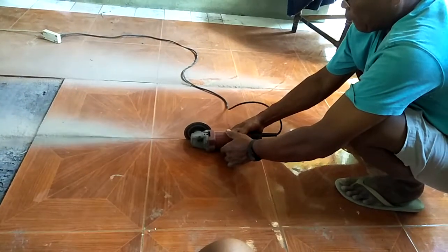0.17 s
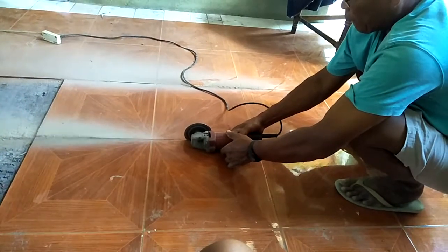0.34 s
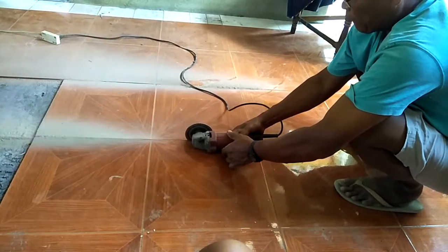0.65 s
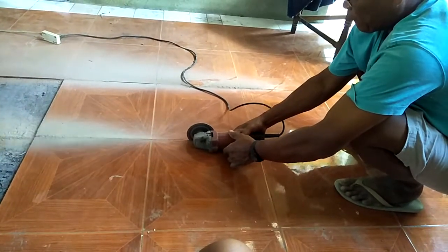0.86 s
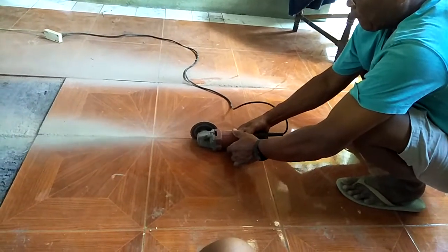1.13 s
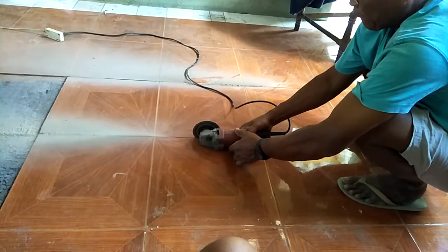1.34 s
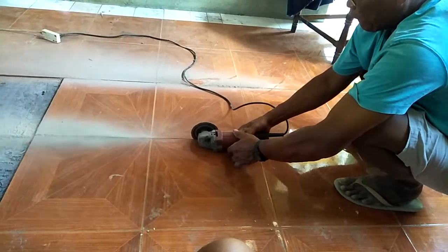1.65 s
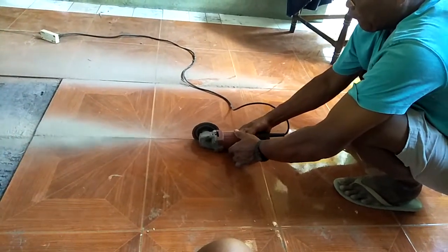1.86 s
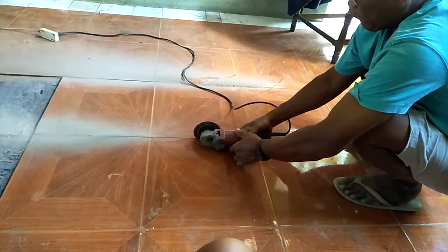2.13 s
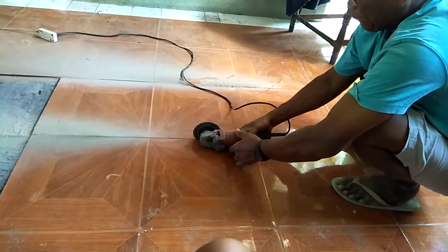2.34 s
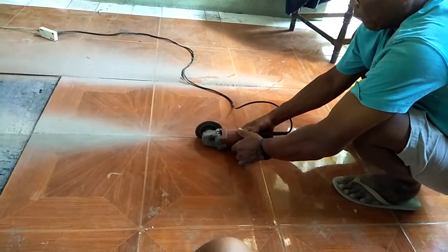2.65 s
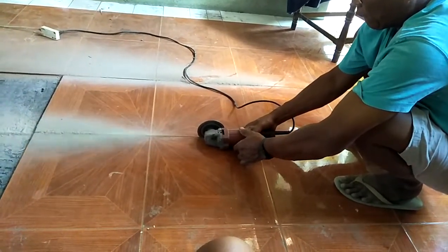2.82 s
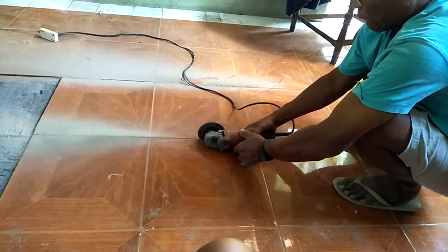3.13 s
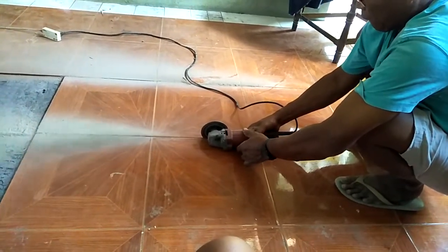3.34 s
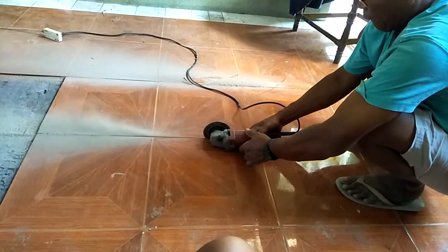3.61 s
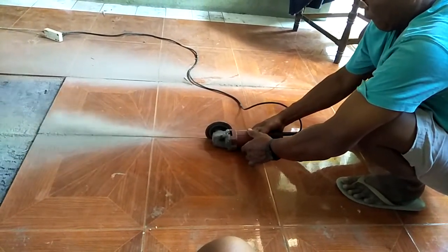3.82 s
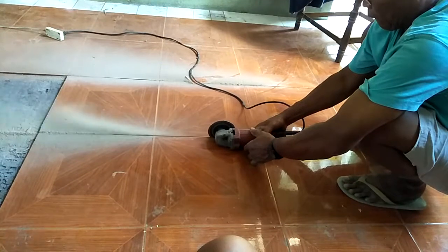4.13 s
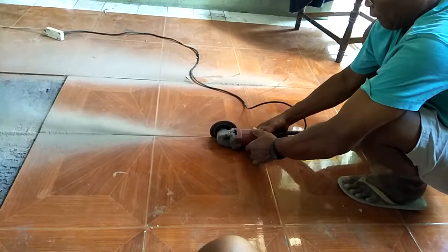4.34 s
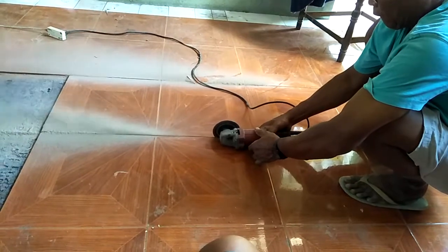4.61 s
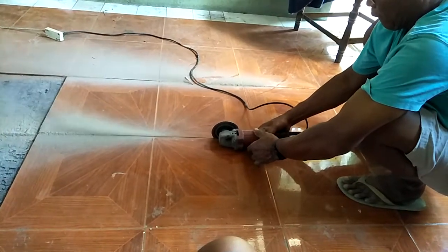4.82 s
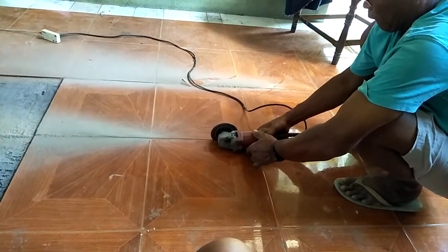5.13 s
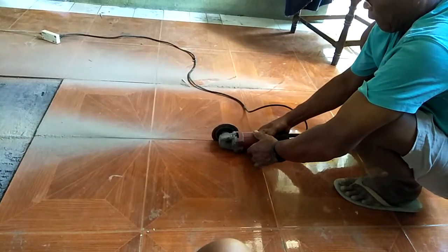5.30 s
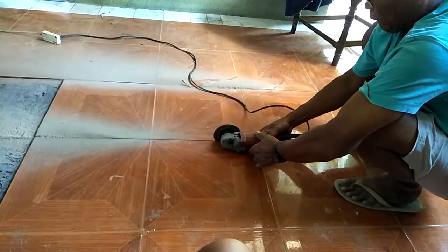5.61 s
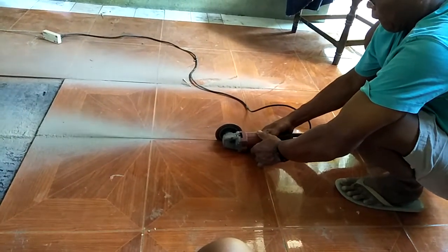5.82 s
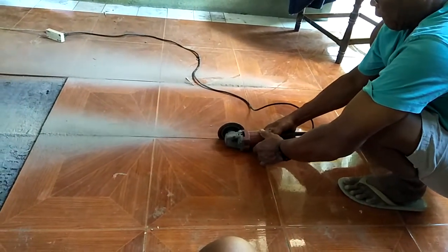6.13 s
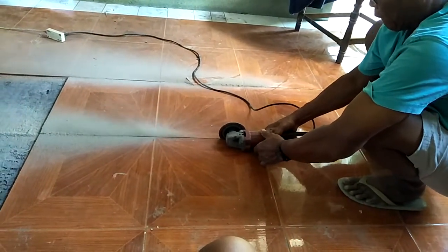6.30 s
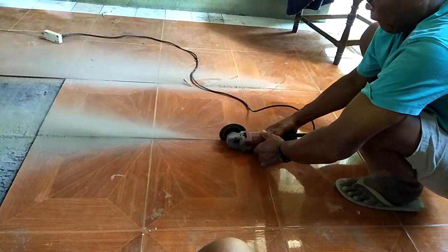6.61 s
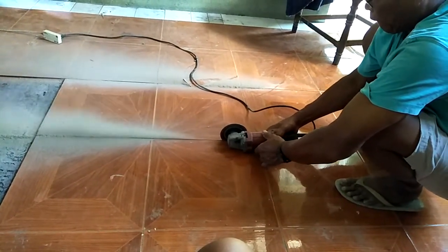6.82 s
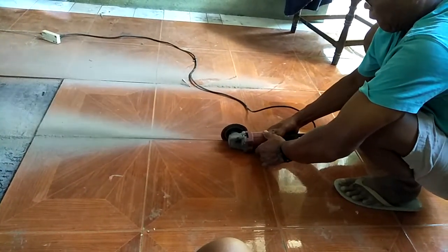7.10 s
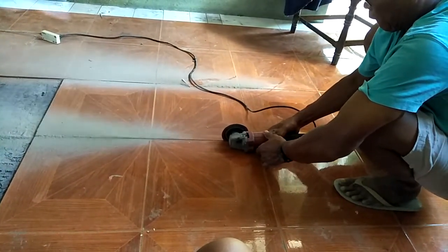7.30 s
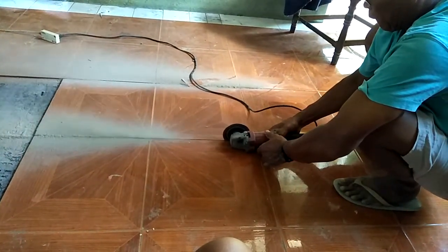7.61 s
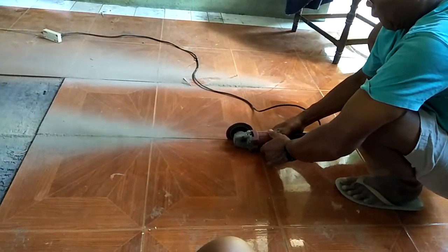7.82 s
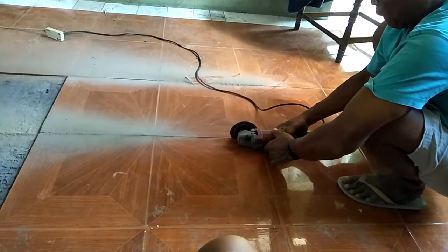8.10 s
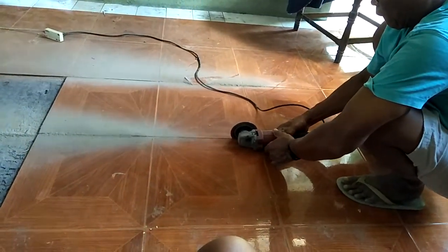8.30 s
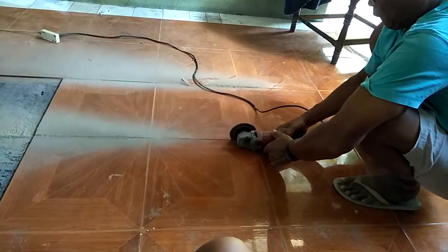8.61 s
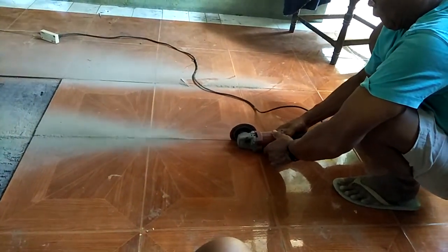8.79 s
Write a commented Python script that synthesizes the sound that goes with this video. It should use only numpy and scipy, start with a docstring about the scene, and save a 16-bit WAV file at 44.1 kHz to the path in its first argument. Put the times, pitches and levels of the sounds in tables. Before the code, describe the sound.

An angle grinder cuts steadily along a grout joint between floor tiles, a harsh screaming rasp with gritty hiss and brief whistles.

```python
"""A harsh, screaming rasp: an angle grinder cuts along a grout joint in a tiled room.
The disc runs slightly out of true and bites once a turn, forcing guard and tile into vibration.
Friction excites the disc's bending modes, grit hisses, and floor and motor drone below.
Now and then stick-slip locks one mode into a whistle. The rim snags on hard spots;
the speed sags under load and leaps when the hand eases off."""
import sys
import numpy as np
from scipy import signal
from scipy.fft import rfft, irfft
from scipy.io import wavfile
from scipy.ndimage import uniform_filter1d

SR = 44100
rng = np.random.default_rng(int(sys.argv[2]) if len(sys.argv) > 2 else 0)


def materialize(psi):
    """Save the field psi as 16-bit PCM at rate SR to the path in sys.argv[1].

    A 1-D psi becomes a single channel; in a 2-D psi each row is a channel.
    """
    bounded = np.clip(np.atleast_2d(psi).T, -1, 1)
    quanta = np.round(bounded * 32767).astype(np.int16)
    wavfile.write(sys.argv[1], SR, quanta)


N = 394694
TIME = np.arange(N) / SR


def from_db(db):
    """Amplitude ratio of a level in decibels."""
    return 10 ** (np.asarray(db) / 20)


def rms_one(x):
    """Normalisation to unit rms."""
    return x / np.sqrt(np.mean(x ** 2) + 1e-20)


def curve(rows):
    """Linear interpolation of (t/s, value) rows at every sample."""
    return np.interp(TIME, *np.transpose(rows))


def drift(rate):
    """Low-passed noise of unit rms that changes about `rate` times a second."""
    hop, settle = 40, 2000
    pole = np.exp(-2 * np.pi * rate * hop / SR)
    noise = rng.standard_normal(N // hop + settle + 2)
    slow = signal.lfilter([1], [1, -2 * pole, pole * pole], noise)[settle:]
    return np.interp(np.arange(N) / hop, np.arange(len(slow)), rms_one(slow))


def swells(rows):
    """Sum in dB of Gaussian pulses, one for each (t/s, half length/s, height/dB) row."""
    return sum(db * np.exp(-((TIME - t) / half) ** 2) for t, half, db in rows)


def steady(x, size=4410):
    """Division by the running rms holds the level and leaves the fast grain."""
    return x / np.sqrt(uniform_filter1d(x ** 2, size) + 1e-12)


def colour(x, spectrum, peaks=(), size=8192):
    """Minimum-phase filter: a broad spectrum with resonance peaks and skirts of 24 dB per octave."""
    hz = np.maximum(np.fft.rfftfreq(size, 1 / SR), 1)
    points, levels = np.transpose(spectrum)
    db = np.interp(np.log(hz), np.log(points), levels)
    db -= 24 * np.abs(np.log2(hz / np.clip(hz, points[0], points[-1])))
    for centre, width, lift in peaks:
        db += lift / (1 + (2 * (hz - centre) / width) ** 2)
    cepstrum = irfft(np.log(from_db(db)))
    cepstrum[1:size // 2] *= 2
    cepstrum[size // 2 + 1:] = 0
    response = irfft(np.exp(rfft(cepstrum)))
    return signal.fftconvolve(x, response)[:N]


def resonate(x, hz, width):
    """Damped oscillator with unit gain at resonance and a bandwidth in Hz."""
    r = np.exp(-np.pi * width / SR)
    feedback = [1, -2 * r * np.cos(2 * np.pi * hz / SR), r * r]
    return signal.lfilter(np.array([1, 0, -1]) * (1 - r * r) / 2, feedback, x)


# Rotation frequency of the disc: t/s, f/Hz
DISC_SPEED = [(0, 141.5), (0.5, 141.6), (1, 143.0), (1.35, 141.1), (1.75, 143.2), (2.15, 141.3),
              (2.7, 141.5), (3, 139.6), (3.8, 138.2), (4, 136.7), (4.75, 134.2), (5.1, 134.9), (5.7, 131.3),
              (6.1, 132.0), (6.35, 150.3), (6.52, 150.1), (6.9, 138.5), (7.15, 134.7), (7.45, 134.6),
              (7.7, 137.3), (8.1, 136.4), (8.67, 130.9), (8.95, 134.2)]

def rotation():
    """Angle is the integral of speed: returns turns per second and turns made."""
    speed = curve(DISC_SPEED)
    return speed, np.cumsum(speed) / SR


def contact(turns, rise=.12, bite_share=.42, drag=.27, uneven_db=2.3, wobble=.025):
    """Periodic forcing: the rim's high spot digs in once a turn, while the rest of the rim drags."""
    angle = np.maximum(turns + wobble * drift(26), 0)
    strength = from_db(uneven_db * np.clip(rng.standard_normal(N // 100), -2, 1.5))
    within_turn = angle % 1
    bite = (1 - np.exp(-(within_turn / rise) ** 2)) * np.exp(-(within_turn / bite_share) ** 2)
    return drag + strength[angle.astype(int)] * bite


# The rim snags on hard spots: t/s, half length/s, rise/dB
RIM_SNAGS = [(1.71, .025, 2), (2.61, 0.031, 1.5), (4.04, 0.043, 2), (4.51, 0.016, 2), (4.61, .015, 3),
             (5.97, 0.017, 4), (6.33, 0.035, 0.5), (6.82, .025, 0.5), (7.6, .02, 0.5), (8.34, 0.018, 2.5),
             (8.65, .015, 2)]
# The hand eases off: t/s, half length/s, drop/dB
HAND_EASES = [(1.39, .045, 5), (4.72, .025, 2.5), (4.98, 0.016, 5), (5.41, 0.018, 3.5), (6.215, 0.048, 5.5),
              (6.87, 0.022, 3), (8.42, 0.068, 1)]

def pressure(judder_db=0.63):
    """Contact pressure in dB varies as the tool judders in the hand, snags and is eased off."""
    judder = rms_one(resonate(drift(30), hz=17, width=14))
    return judder_db * judder + swells(RIM_SNAGS) - swells(HAND_EASES)


def flutter(db, depth_db):
    """Amplitude modulation: a gain that wavers at random about a level."""
    return from_db(db + depth_db * drift(9.3))


def rim(turns, memory, size=256):
    """Quasi-periodic roughness: the same grains return each turn and slowly wear away."""
    fresh = rng.standard_normal((N // size, size))
    grains = signal.lfilter([np.sqrt(1 - memory ** 2)], [1, -memory], fresh, axis=0).ravel()
    return rms_one(np.interp(turns * size, np.arange(len(grains)), grains))


# Rasp as the disc bites: t/s, level/dB
RASP_LEVEL = [(0.0, -19.5), (0.35, -20.5), (0.55, -19.5), (1.5, -23.0), (2.0, -20), (2.25, -22),
              (2.75, -19.5), (3.0, -21.5), (4.2, -22), (4.4, -18.5), (4.7, -21), (4.9, -20.0), (5.4, -21.5),
              (8.25, -20), (8.8, -22.5), (8.95, -22.5)]
# Broad response of the guard: f/Hz, level/dB
GUARD_SPECTRUM = [(1200, -36), (1770, -19.5), (1940, -4.5), (2180, -4), (2480, -8), (2850, -4.5),
                  (3250, -9.5), (3560, -14.5), (3950, -18.5), (4300, -21), (4900, -21), (5300, -42.5)]
# Its resonances: f/Hz, bandwidth/Hz, lift/dB
GUARD_RESONANCES = [(1972, 55, 7), (2095, 55, 7), (2222, 40, 4), (2428, 35, 5), (2551, 40, 3),
                    (2689, 45, 4), (2877, 40, 2.5), (3785, 60, 4)]

def guard_rasp(turns, force, press_db):
    """Forced vibration: crumbling grout and returning rim grains shake the guard on every turn."""
    gain = flutter(curve(RASP_LEVEL) + 0.73 * press_db, depth_db=0.87)
    scrape = force * (0.47 * rim(turns, memory=0.85) + rng.standard_normal(N))
    return gain * steady(colour(scrape, GUARD_SPECTRUM, GUARD_RESONANCES), size=2200)


# Scream of the disc's strongest bending mode: t/s, level/dB
SCREAM_LEVEL = [(0.0, -20.5), (1.0, -19.5), (1.35, -20.5), (1.4, -21), (1.8, -19), (2.05, -22),
                (3.7, -18.5), (4.6, -22.5), (5.15, -19), (5.9, -22), (6.35, -17.5), (6.6, -21.5),
                (7.35, -22.5), (7.65, -19.5), (8.15, -21), (8.95, -19.5)]
# Broad response around that mode: f/Hz, level/dB
SCREAM_SPECTRUM = [(2750, -20.5), (3020, -3.5), (3190, -5.5), (3310, -4.5), (3420, -9), (3600, -18)]
# Resonances in that band: f/Hz, bandwidth/Hz, lift/dB
SCREAM_RESONANCES = [(3045, 90, 3.5), (3180, 55, 6), (3293, 55, 7)]

def disc_scream(turns, force, press_db, mode_hz=3188, width_hz=90, lock_db=3.5):
    """Resonance: the strongest mode always rasps, and screams when the rim's ripple meets its pitch."""
    load = 0.54 + force
    scrape = load * (rim(turns, memory=0.81) + rng.standard_normal(N))
    rasping = steady(colour(scrape, SCREAM_SPECTRUM, SCREAM_RESONANCES), size=1800)
    ringing = resonate(resonate(rim_ripple(turns), mode_hz, width_hz), mode_hz, width_hz)
    locked = from_db(lock_db) * rms_one(load) * ringing
    gain = flutter(curve(SCREAM_LEVEL) + 0.6 * press_db, depth_db=0.6)
    return gain * steady(rasping + locked, size=1800)


# Ripple worn into the rim: waves per turn, level/dB
RIPPLE_ORDERS = [(22, -6), (23, 0), (24, -1)]

def rim_ripple(turns, waver_db=0.5):
    """Harmonic excitation: a rim with n waves drives the disc at n times its rotation frequency."""
    return sum(from_db(db + waver_db * drift(12)) * np.sin(2 * np.pi * order * turns + drift(5.4))
               for order, db in RIPPLE_ORDERS)


# Rumble of the tile, set by the depth of the cut: t/s, level/dB
TILE_LEVEL = [(0.0, -35), (0.5, -30.5), (0.95, -33.5), (2.3, -34.5), (2.6, -31), (3.75, -35.5), (4.35, -33),
              (4.7, -34.5), (5.0, -34), (5.6, -37), (6.05, -30), (6.35, -29.5), (6.8, -35.5), (7.75, -36),
              (7.95, -34), (8.45, -35), (8.65, -32.5), (8.95, -33)]
# Broad response of the tile: f/Hz, level/dB
TILE_SPECTRUM = [(150, -25), (430, -11), (560, -5.5), (750, -7), (950, -3), (1300, 5.5), (1650, 3.5),
                 (2100, 1.5), (3500, -51.5)]
# Its resonances: f/Hz, bandwidth/Hz, lift/dB
TILE_RESONANCES = [(589.7, 20, 11.4), (755, 86, 8.5), (940, 20, 2.5), (1335, 9.6, 1.9)]

def tile_rumble(turns, force, press_db):
    """Action and reaction: the same blows drive the tile, whose lower resonances sound duller."""
    gain = flutter(curve(TILE_LEVEL) + 0.9 * press_db, depth_db=0.5)
    scrape = (0.71 + force) * (0.43 * rim(turns, memory=0.878) + rng.standard_normal(N))
    return gain * steady(colour(scrape, TILE_SPECTRUM, TILE_RESONANCES))


def ring_modes(force, modes, swell_db):
    """Modal superposition: friction feeds every mode, and their balance shifts along the joint."""
    out = np.zeros(N)
    friction = force * rng.standard_normal(N)
    along = np.linspace(0, 1, N) ** 2
    for hz, width, start_db, end_db in modes:
        ringing = rms_one(resonate(resonate(friction, hz, width), hz, 6 * width))
        out += from_db(start_db + (end_db - start_db) * along + swell_db * drift(13.5)) * ringing
    return steady(out, size=2200)


# Singing of the low modes: t/s, level/dB
SING_LEVEL = [(0.0, -32.5), (0.2, -32), (0.75, -30.5), (1.0, -34.5), (1.25, -29.5), (2.15, -35), (2.7, -28),
              (2.85, -31), (3.9, -34.0), (4.5, -29.5), (5.3, -31), (5.5, -35.5), (6.15, -27), (7.0, -32),
              (7.3, -28.5), (8.4, -29), (8.45, -31.5), (8.95, -26.5)]
# Low and high bending modes of the disc: f/Hz, bandwidth/Hz, start level/dB, end level/dB
LOW_BENDING = [(4053, 32, -1.5, -2.5), (4124, 22, 1, -0.5), (4610, 75, -8, 3), (4692, 49, -1.5, 3.5),
               (5070, 29, -11, -13), (5607, 36, -13, -8), (5920, 45, -13.5, -19.5), (6428, 53, -13, -8)]
HIGH_BENDING = [(7560, 47, -5.5, -17), (7780, 53, -7.5, -11.5), (8400, 30, -12, -8), (8662, 42, -0.5, 2),
                (9940, 45, -21, -20), (11330, 81, -3, 0), (12000, 90, -12, -10), (12540, 99, -8, -7),
                (12750, 100, -8, 1.5), (13490, 60, -18, -9), (14310, 110, -8.5, -2), (15560, 60, -13, -5)]

def disc_singing(force, press_db, dust_db):
    """Bending vibration: the disc's flank rubs the tile edge; the high modes partly follow the dust."""
    low_db = curve(SING_LEVEL) + 0.82 * press_db
    high_db = -34 + 0.32 * (dust_db - dust_db.mean()) + press_db
    low = flutter(low_db, depth_db=1.03) * ring_modes(force, LOW_BENDING, swell_db=1.0)
    high = flutter(high_db, depth_db=1.7) * ring_modes(force, HIGH_BENDING, swell_db=0.5)
    return low + high


# Hiss of dust thrown from the joint: t/s, level/dB
DUST_LEVEL = [(0.0, -32.5), (0.55, -32), (1.05, -36.5), (1.15, -33), (2.15, -35.5), (2.85, -32.5),
              (3.1, -35), (6.25, -36.0), (6.35, -35), (7.75, -35.5), (8.35, -34.5), (8.5, -41), (8.75, -33),
              (8.95, -38.5)]
# Spectrum of the hiss: f/Hz, level/dB
GRIT_SPECTRUM = [(3500, 12.5), (5000, -64), (6200, 6), (7100, -18), (7900, 0), (9200, 2.5), (10700, 8),
                 (12200, -1), (13100, -8), (13700, 3), (14900, -3), (15800, -25)]

def grit_hiss(force, press_db, dust_db, spray=1.2, spurt_db=1.1):
    """Fracture noise: grains crack off in uneven spurts over a smooth spray of dust."""
    gain = flutter(dust_db + 0.9 * press_db, depth_db=0.3)
    cracks = (spray + force) * rng.standard_normal(N) * from_db(spurt_db * drift(48))
    return gain * steady(colour(cracks, GRIT_SPECTRUM))


# Response of the floor: f/Hz, level/dB
FLOOR_SPECTRUM = [(20, -15), (45, -13), (110, -5), (180, -7), (320, -7.5), (700, -31)]
# Dull knocks through the floor: t/s, half length/s, rise/dB
FLOOR_KNOCKS = [(.7, .025, 6), (4.06, 0.031, 3), (6.2, 0.1, 13), (8.36, 0.018, 10), (8.91, .025, 7)]

def floor_thrum(press_db, growth_db):
    """Structure-borne sound: the floor carries low noise in uneven lumps."""
    gain = flutter(-59.5 + growth_db + swells(FLOOR_KNOCKS) + 0.36 * press_db, depth_db=2.5)
    return gain * rms_one(colour(rng.standard_normal(N), FLOOR_SPECTRUM))


def motor_hum(turns, speed, growth_db, gear_ratio=2.49, free_hz=140.8, waver_db=1.4):
    """Rotating unbalance: the disc shaft and the faster armature give three low tones."""
    armature_db = -56 - np.maximum(free_hz - speed, 0)  # 1 dB weaker for each Hz of sag
    partials = [(1, -63.5 + growth_db), (gear_ratio, armature_db), (2 * gear_ratio, armature_db + 4)]
    return np.sqrt(2) * sum(from_db(db + waver_db * drift(6)) * np.sin(2 * np.pi * order * turns)
                            for order, db in partials)


# Moments when one mode whistles: t/s, half length/s, f/Hz, rms level/dB
MODE_LOCKS = [(.68, .19, 4122, -29), (.74, .15, 4692, -30), (1.1, .6, 1856, -33), (1.28, .06, 4128, -29.5),
              (1.32, .17, 4697, -33), (2.0, .07, 4135, -34), (2.66, .14, 4115, -29), (4.59, .03, 8650, -33),
              (5.01, .015, 8650, -32), (5.13, .045, 8650, -33), (6.01, .13, 4158, -30.5),
              (6.33, .06, 4135, -31), (7.39, .09, 4695, -31.5), (8.08, .06, 4626, -32),
              (8.29, .035, 8650, -32), (8.32, .06, 4713, -31)]

def whistles(waver_hz=7.34, flutter_db=1.5):
    """Self-excited oscillation: stick-slip locks onto one mode; a nearly pure tone swells and fades."""
    out = np.zeros(N)
    for t, half, hz, db in MODE_LOCKS:
        phase = 2 * np.pi * np.cumsum(hz + waver_hz * drift(30)) / SR
        envelope = np.exp(-((TIME - t) / half) ** 2)
        out += from_db(db + flutter_db * drift(21)) * envelope * np.sin(phase)
    return np.sqrt(2) * out


def room(x, t60_s=0.2, wet_db=-10, count=4):
    """Reverberation: hard surfaces add a short, dense tail that shifts as tool and arms move."""
    t = np.arange(SR // 3) / SR
    wet = 0
    for _ in range(count):
        tail = rng.standard_normal(len(t)) * from_db(-60 * t / t60_s) * (t > .004)
        wet = wet + drift(1.57) * signal.oaconvolve(x, tail / np.linalg.norm(tail))[:N]
    return x + from_db(wet_db) * wet / np.sqrt(count)


def scene():
    """Superposition: one turning disc and the pressure on it drive the cut; hum and whistles stay dry."""
    speed, turns = rotation()
    press_db = pressure()
    force = contact(turns)
    dust_db = curve(DUST_LEVEL)
    growth_db = 0.44 * TIME  # floor and shaft grow louder as the cut moves along
    cut = guard_rasp(turns, force, press_db)
    cut += disc_scream(turns, force, press_db)
    cut += tile_rumble(turns, force, press_db)
    cut += disc_singing(force, press_db, dust_db)
    cut += grit_hiss(force, press_db, dust_db)
    cut += floor_thrum(press_db, growth_db)
    tones = motor_hum(turns, speed, growth_db) + whistles()
    return (room(cut) + tones)[None]


def record(dry, ceiling=.75, cutoff_hz=15680):
    """Soft saturation rounds the loudest peaks; a steep low-pass filter cuts the top."""
    rounded = dry / (1 + (dry / ceiling) ** 8) ** (1 / 8)
    return signal.sosfilt(signal.ellip(14, .1, 100, cutoff_hz, fs=SR, output="sos"), rounded)


dry = scene()
out = record(dry)
materialize(out)
```